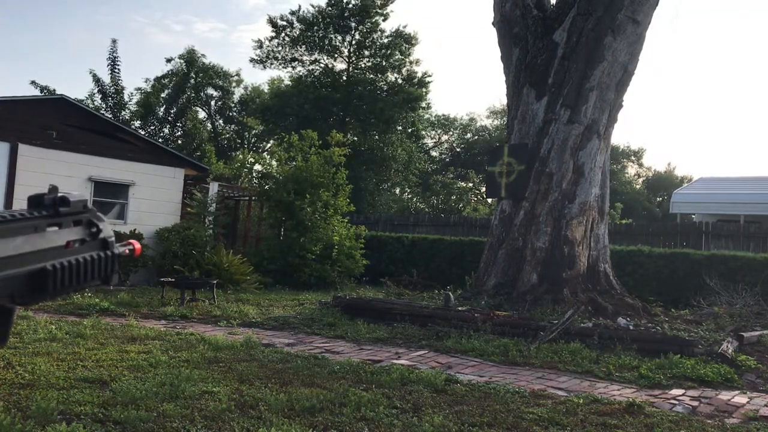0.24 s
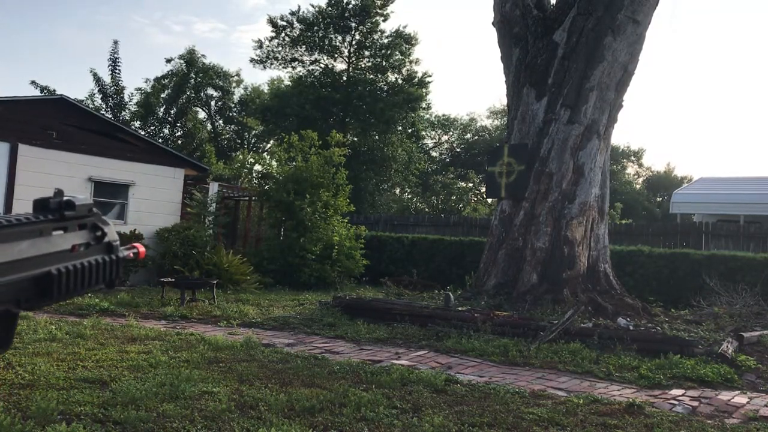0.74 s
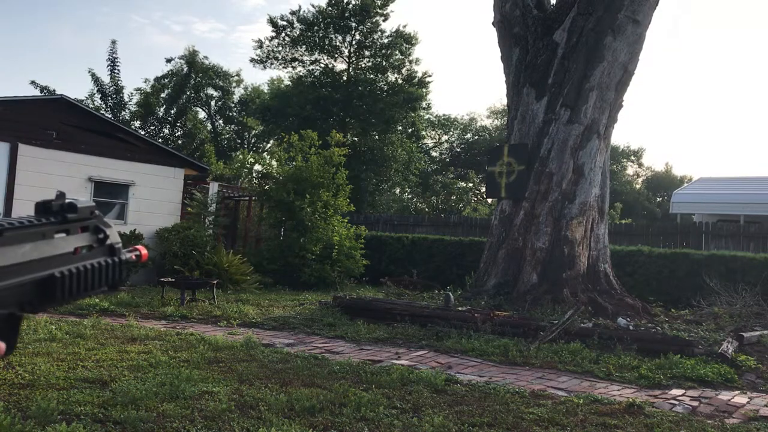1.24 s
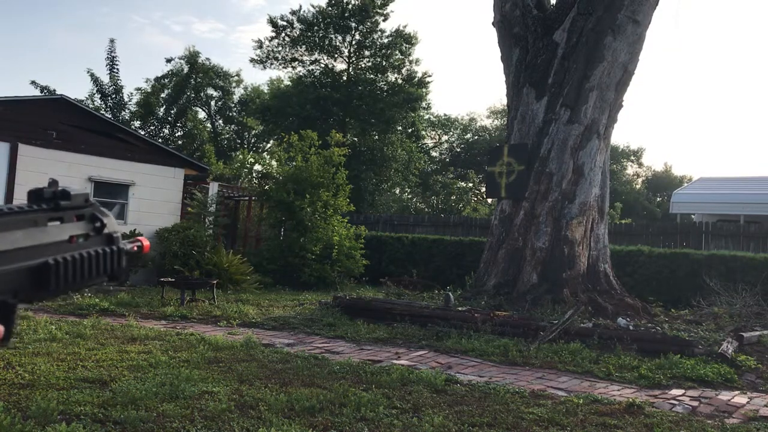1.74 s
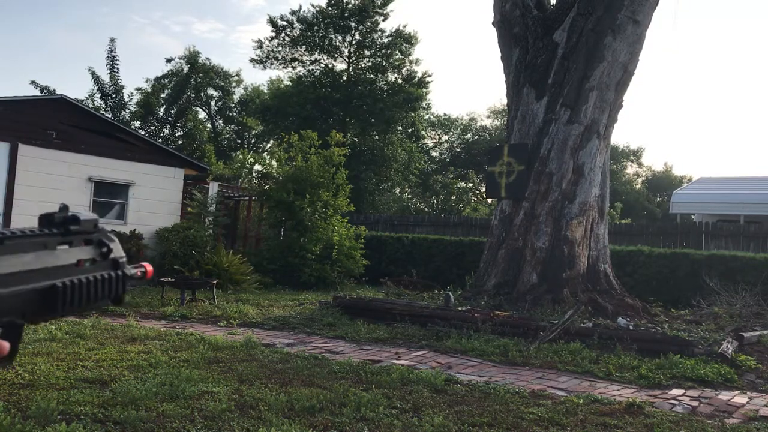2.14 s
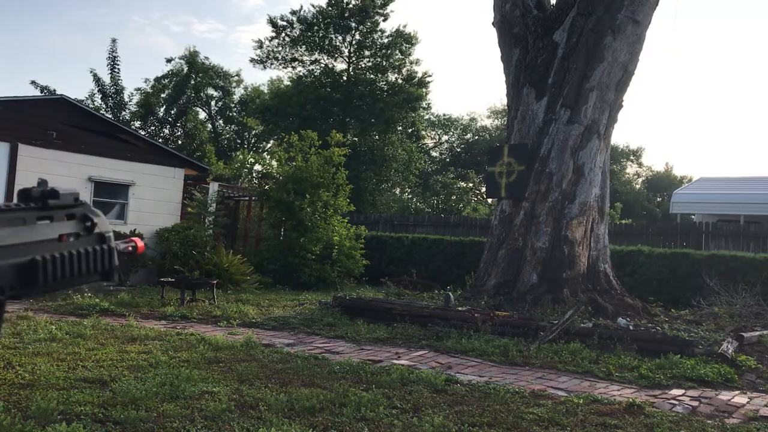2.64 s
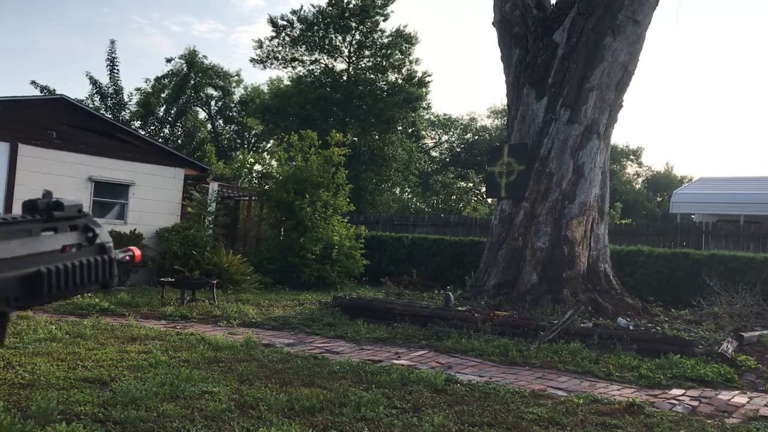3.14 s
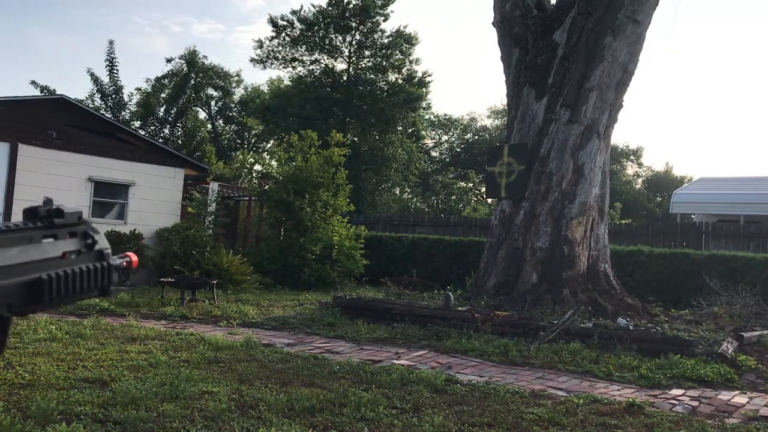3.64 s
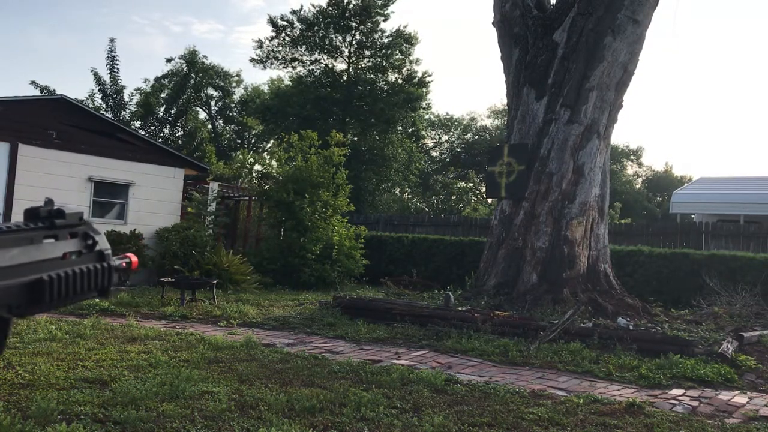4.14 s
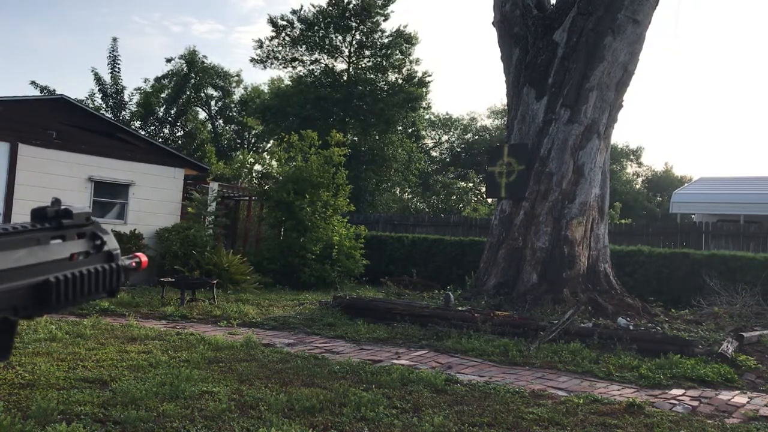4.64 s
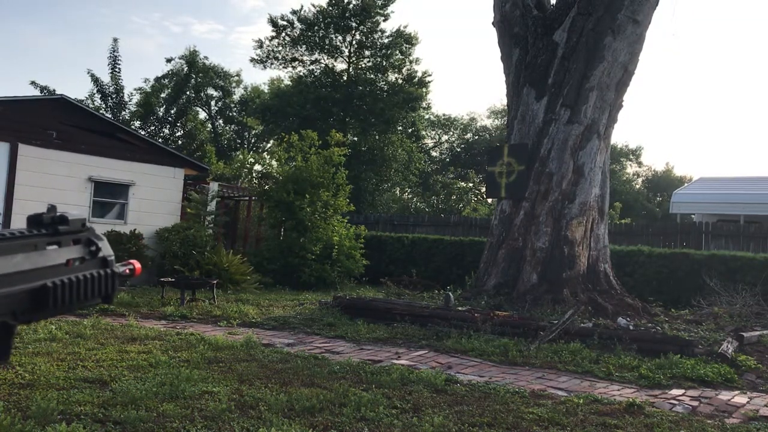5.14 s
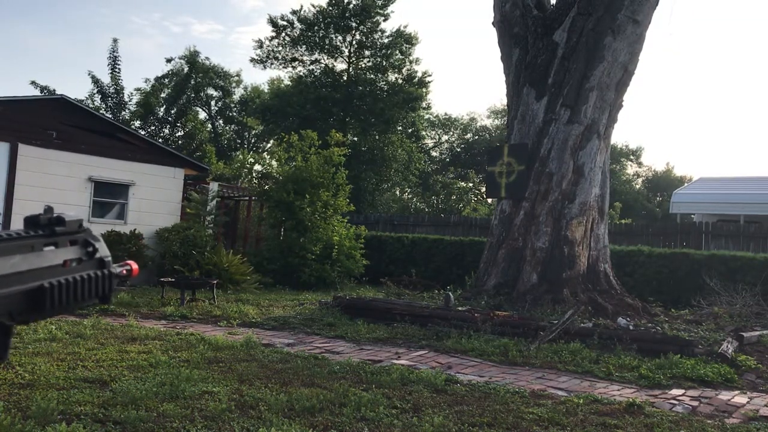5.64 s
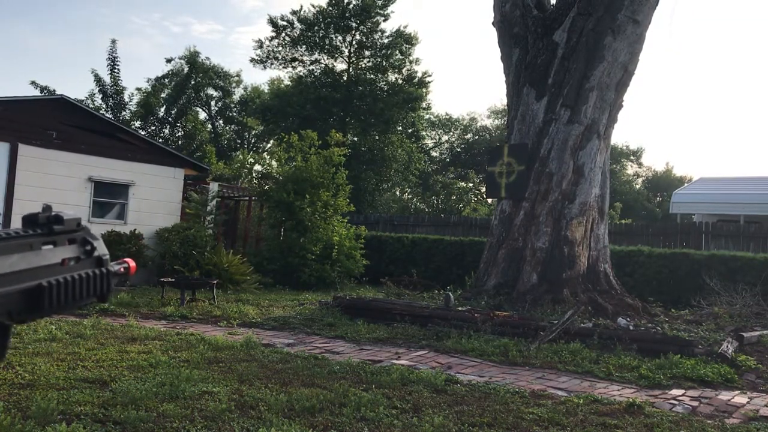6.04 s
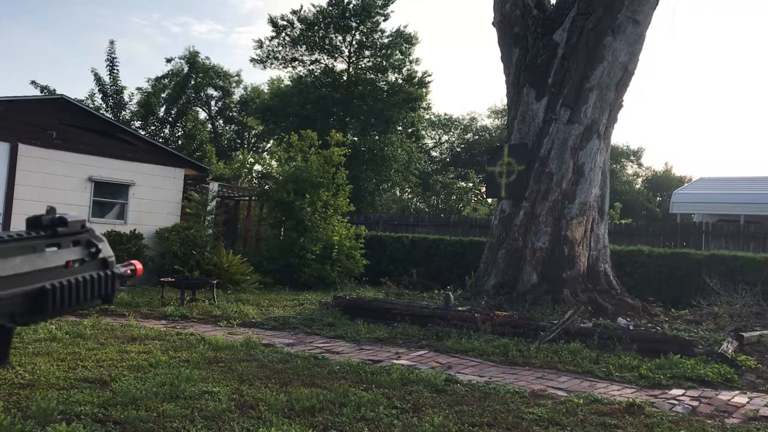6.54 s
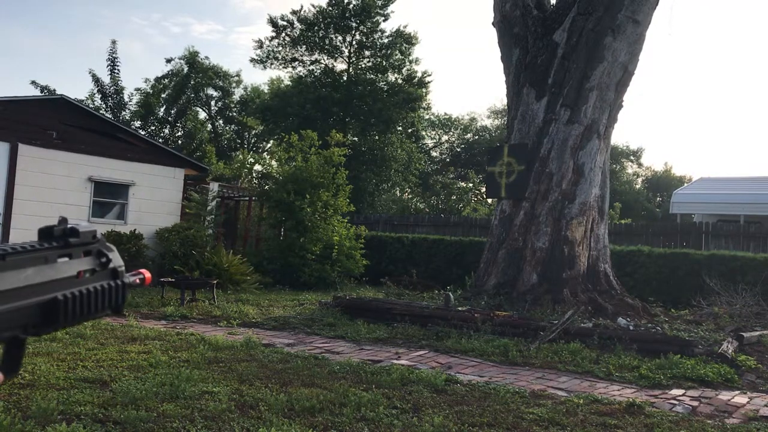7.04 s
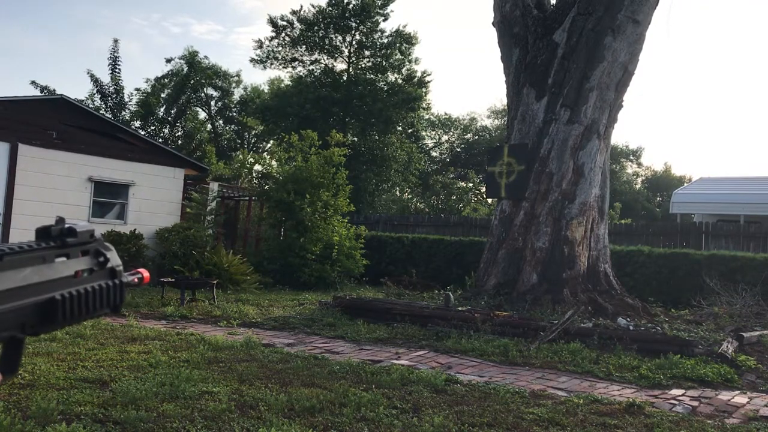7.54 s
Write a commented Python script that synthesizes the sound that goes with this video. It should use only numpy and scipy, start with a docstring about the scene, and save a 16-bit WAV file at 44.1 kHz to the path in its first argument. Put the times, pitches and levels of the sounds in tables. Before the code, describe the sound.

Two close full-auto bursts from an electric airsoft gun, the second much longer, clacking and whirring as pellets tick against a tree.

```python
"""Airsoft rifle in a backyard

An electric airsoft rifle fires two slow full-auto bursts close to the microphone. In each cycle the
gears whine lower as they load the spring, the piston slams home and air pops from the barrel; half a
cycle later the pellet hits a tree. Between the bursts the gears run back against their latch, a sleeve
rubs and the gun clicks in the hands. Distant traffic and light air lie underneath."""
import sys
import numpy as np
from scipy import signal
from scipy.fft import rfft, irfft
from scipy.io import wavfile

SR = 44100
rng = np.random.default_rng(int(sys.argv[2]) if len(sys.argv) > 2 else 0)


def unload_wav(signal):
    """Save mono or channel-first audio to the path in sys.argv[1] as 16-bit WAV at rate SR, clipped to [-1, 1]."""
    wavfile.write(
        sys.argv[1],
        SR,
        np.round(np.clip(np.atleast_2d(signal).T, -1, 1) * 32767).astype(np.int16),
    )


N = 343980
TIME = np.arange(N) / SR
AGE = np.arange(2048) / SR  # time within one short sound
RELEASE_S, PULL_S, CYCLE_S = 1.31, 2.995, .137  # trigger off, trigger on again, nominal cycle


def undb(db):
    """Decibels to amplitude."""
    return 10 ** (np.asarray(db) / 20)


def unit(x):
    """Scale to rms 1."""
    return x / np.sqrt(np.mean(x ** 2))


def burst(x, db, span_s):
    """Scale x so that its energy, spread over span_s, has level db."""
    return x * undb(db) / np.sqrt(np.sum(x ** 2) / (span_s * SR))


def add(out, s, x):
    """Mix x into out from time s."""
    i = int(s * SR)
    part = x[max(0, -i):max(0, N - i)]
    out[max(0, i):max(0, i) + len(part)] += part


def wander(rate_hz):
    """Smooth random motion, rms 1."""
    knots = rng.standard_normal(int(N / SR * rate_hz) + 2)
    return unit(np.interp(TIME * rate_hz, np.arange(len(knots)), knots))


def response(points, peaks=(), size=4096):
    """Minimum-phase impulse response from points (Hz, dB) and peaks (Hz, width Hz, dB)."""
    f = np.maximum(np.fft.rfftfreq(size, 1 / SR), 1)
    hz, db = np.transpose(points)
    db = np.interp(np.log(f), np.log(hz), db)
    db += sum(gain / (1 + (2 * (f - centre) / width) ** 2) for centre, width, gain in peaks)
    cepstrum = irfft(np.log(undb(db)))
    cepstrum[1:size // 2] *= 2
    cepstrum[size // 2 + 1:] = 0
    return irfft(np.exp(rfft(cepstrum)))[:size // 2]


def through(x, h):
    """Filter x with impulse response h."""
    return signal.fftconvolve(x, h)[:len(x)]


def chatter(decay_s):
    """Fading cloud of tiny contacts, energy 1."""
    x = rng.standard_normal(len(AGE)) * np.exp(-AGE / decay_s)
    return x / np.linalg.norm(x)


def whiten(x):
    """Flatten a contact cloud's spectrum, keep its phase, fade its tail."""
    return irfft(np.exp(1j * np.angle(rfft(x)))) * np.exp(-AGE / .0082)


def ring(hz, t60):
    """One damped mode."""
    return np.sin(2 * np.pi * hz * AGE) * np.exp(-np.log(1000) * AGE / t60)


def puff(hz, t60):
    """Damped swing of air, as much in as out."""
    return np.gradient(ring(hz, t60) * (1 - np.exp(-AGE * hz * 4)))


def grains(spread_db):
    """Noise of unevenly sized contacts, rms 1."""
    return unit(rng.standard_normal(N) * undb(spread_db * wander(2500)))


# shell resonances: (frequency [Hz], width [Hz], gain [dB])
SHELL_PEAKS = [(483.7, 31, 5.5), (640, 160, 4.5), (924, 157, 7.5), (1205, 240, 7), (1770, 230, 0.5),
               (3080, 130, 2), (4450, 700, 6.5), (5730, 340, 3), (11970, 480, 7.5), (14470, 360, 7.5)]
# slam spectrum: (frequency [Hz], gain [dB])
SLAM_SPECTRUM = [(40, -27), (150, -4), (320, -19.5), (600, -5.5), (1000, -4), (1450, -3), (1850, 2),
                 (2200, -1), (2650, 3), (4200, -2), (5200, -7.5), (5900, 2), (7500, -3.5), (10300, -6.5),
                 (12000, -7.5), (15500, -16.5)]
# piston bounces: (delay [s], relative level [dB])
BOUNCES = [(0, -1), (.001, -9.5), (.0019, -5.5), (.0025, -3)]
# receiver modes: (frequency [Hz], level [dB], t60 [s])
RECEIVER_MODES = [(481.6, -27, 0.059), (940, -30, 0.053)]


def piston(out, s, strength_db, pressure, contacts, body):
    """The piston scrapes forward, slams and bounces, cushioned by air; the receiver recoils and rings."""
    blows = .87 * contacts + .6 * chatter(decay_s=.0032) + .04 * chatter(decay_s=.012)
    for delay_s, db in BOUNCES:
        delay_s *= 1 + .015 * rng.standard_normal()
        blows[int(delay_s * SR)] -= undb(db + 1.5 * rng.standard_normal())
    cushion_db = -pressure
    add(out, s, burst(through(blows, body), -11 + strength_db + cushion_db, span_s=.0038))
    add(out, s, sum(undb(db + strength_db) * ring(hz, t60) for hz, db, t60 in RECEIVER_MODES))
    scrape = through(np.r_[chatter(decay_s=.003)[::-1], np.zeros(len(AGE))], body)
    add(out, s - AGE[-1], burst(scrape, -20 + strength_db, span_s=.0035))
    recoil = puff(hz=210, t60=.012)
    add(out, s - .0018, burst(recoil, db=-24, span_s=.00063))


# barrel air modes: (frequency [Hz], relative level [dB], t60 [s])
BARREL_MODES = [(230, -16.5, 0.029), (356.5, -5.5, 0.025), (500, -11, 0.02), (1076, 6.5, 0.0098),
                (1826, 5.5, 0.01), (2444, 9, 0.006), (3620, -14.5, 0.0094)]


def air_pop(out, s, strength_db, seal, pressure, body):
    """Air rings the barrel and spits at the muzzle; a tight seal pops later and thumps deeper."""
    leaky_s, sealed_s = .0022, .0038
    leaky_hz, sealed_hz = 660, 150
    pop_s = s + leaky_s + (sealed_s - leaky_s) * seal ** 2
    pop = sum(undb(db + rng.standard_normal()) * puff(hz * (1 + .056 * rng.standard_normal()), t60) / hz
              for hz, db, t60 in BARREL_MODES)
    add(out, pop_s, burst(pop, -17.5 + strength_db + 3.5 * pressure, span_s=.004))
    spit = through(chatter(decay_s=.00091), body)
    add(out, pop_s, burst(spit, -17.5 + strength_db, span_s=.0047))
    thump_hz = leaky_hz * (sealed_hz / leaky_hz) ** seal
    add(out, pop_s - .0006, burst(puff(thump_hz, t60=1.5 / thump_hz), db=-31, span_s=.013))


# small-part tick spectrum: (frequency [Hz], gain [dB])
TICK_SPECTRUM = [(200, -36), (3000, -19), (6000, 1), (8500, 2.5), (10300, -5), (12000, -0.5), (15500, -32)]
# dull knock spectrum, gear or bark: (frequency [Hz], gain [dB])
KNOCK_SPECTRUM = [(200, -32), (480, -2.5), (700, -2), (1050, 6), (1500, 4), (3000, -26), (12000, -20)]


def gear_pickup(out, s):
    """After a slam the anti-reversal latch ticks, the gear knocks on the piston, a loose part ticks."""
    small_part = response(TICK_SPECTRUM)
    latch = through(chatter(decay_s=.0004), small_part)
    latch = burst(latch, db=-26.5 + 3.5 * rng.standard_normal(), span_s=.0015)
    add(out, s + .02 + .0027 * rng.standard_normal(), latch)
    knock = through(chatter(decay_s=.0015), response(KNOCK_SPECTRUM, SHELL_PEAKS))
    add(out, s + .029, burst(knock, db=-32, span_s=.004))
    loose = through(chatter(decay_s=.0006), small_part)
    loose = burst(loose, db=-29 + 3 * rng.standard_normal(), span_s=.0015)
    add(out, s + rng.uniform(.025, .055), loose)


# shots: (time [s], strength [dB], air seal [0-1], pellet energy into loose bark [0-1])
SHOTS = [(-.02, 3, 0.6, 0.06), (0.1198, 1, 1, .98), (0.2552, -.5, 0.01, 0.24), (.3952, -0.5, 0.98, 0.15),
         (.534, -1, 0.58, 0.37), (.672, -1.5, 0.56, 0.36), (0.8062, -0.5, 0.56, 0.27),
         (0.94, 0, 0.68, 0.24), (1.0753, 0, 0.56, 0.43), (1.209, -1, 0.53, 0.05), (3.0454, -1, 0.59, 0),
         (3.1841, -1, 0.99, .95), (3.3212, 0, 0.38, 0.03), (3.4585, -2, 0.95, 0.03),
         (3.5956, -0.5, 0.92, 0.22), (3.7318, 1.5, 0.92, 0.06), (3.8685, 1, 0.98, 0.13),
         (4.0059, .5, 0.88, 0.36), (4.1417, 2, 0.98, .01), (4.2786, 2, 0.96, 0.42),
         (4.416, 2.5, 0.96, 0.91), (4.5513, -.5, 0.07, 0.06), (4.6898, 0.5, 1, 0.04),
         (4.8281, -1, 0.96, .96), (4.9654, 0, 0.01, 0.37), (5.103, -0.5, 0.96, 0.06),
         (5.2417, 2, 0.88, .93), (5.3778, -1, 0.07, 0.17), (5.515, 1, 0.99, 0.92),
         (5.6521, -.5, 0.04, 0.38), (5.7893, 0, 0.96, 0.2), (5.9288, 1.5, 0.93, .25),
         (6.0668, 0, 0.95, .65), (6.2041, -0.5, 0.3, .02), (6.345, -1, 0.95, 0.13), (6.4858, -0.5, 1, 0.9),
         (6.6272, 2, 0, 0.26), (6.7706, 3.5, 0.97, 0.1), (6.912, 2, 1, 0.82), (7.0545, -1, 0.52, 0.3),
         (7.198, 1, 0.94, 0.88), (7.3393, 0, 0.1, 0.38), (7.4822, 2, 0.96, 0.89), (7.6253, -0.5, 0, 0.28),
         (7.7699, 1, 0.94, .2)]


def shots():
    """Each shot: piston slam, air pop, gears taking up the load again."""
    out, body = np.zeros(N), response(SLAM_SPECTRUM, SHELL_PEAKS)
    contacts = whiten(chatter(decay_s=.0035))  # same parts, same order on every shot
    for s, strength_db, seal, _ in SHOTS:
        pressure = 4 * seal * (1 - seal)  # at half seal the pellet leaves at peak pressure
        piston(out, s, strength_db, pressure, contacts, body)
        air_pop(out, s, strength_db, seal, pressure, body)
        gear_pickup(out, s)
    return out


def stroke():
    """Share of the cycle since the last slam, and that cycle's length in s."""
    shot_s = np.array(SHOTS)[:, 0]
    rest = np.sum(shot_s < RELEASE_S) - 1 + .75  # piston waits part-cocked between bursts
    slam_s = np.r_[shot_s, shot_s[-1] + CYCLE_S]
    knot_s = np.sort(np.r_[slam_s, RELEASE_S, PULL_S])
    turns = np.interp(TIME, knot_s, np.sort(np.r_[:len(slam_s), rest, rest]))
    gap_s = np.diff(slam_s)
    length_s = np.where(gap_s < 2 * CYCLE_S, gap_s, CYCLE_S)
    return turns % 1, length_s[np.minimum(turns.astype(int), len(shot_s) - 1)]


def motor_speed():
    """Share of full speed: running, coasting, thrown back by the spring, restarting."""
    coast_s, rebound_at_s, rise_s, fall_s, spin_up_s = .036, 1.365, .025, .05, .014
    coast = np.exp(-np.maximum(TIME - RELEASE_S, 0) / coast_s)
    since_s = TIME - rebound_at_s
    rebound = .62 * np.exp(-np.abs(since_s) / np.where(since_s < 0, rise_s, fall_s))
    restart = 1 - .3 * np.exp(-np.maximum(TIME - PULL_S, 0) / spin_up_s)
    return np.where(TIME < PULL_S, np.maximum(coast, rebound), restart)


# mesh harmonics: (multiple, level [dB])
MESH_HARMONICS = [(1, -0.5), (2, -6), (3, -3.5), (4, -9)]
# shell radiation of the whine: (frequency [Hz], gain [dB])
WHINE_SPECTRUM = [(400, -6.5), (1200, -3.5), (1800, -3), (2400, 1), (3600, -6.5), (4700, -6.5), (5300, -22),
                  (7000, -1.5), (12000, -24.5)]
# resonances the harmonics sweep through: (frequency [Hz], width [Hz], gain [dB])
WHINE_PEAKS = [(1559, 132, 9.1), (3160, 120, 12), (4534, 250, 10.3)]
# whine gain at the hardest pull: (time [s], gain [dB])
WHINE_GAIN = [(.6, -26), (3.1, -23.5), (5.5, -23), (7.7, -24)]


def gear_whine(tooth_phase, rotor, share):
    """Mesh tone, loudest at the hardest pull; unlike teeth roughen the high harmonics most."""
    whine = np.zeros(N)
    for multiple, db in MESH_HARMONICS:
        rough_db = .51 * rotor + (1.5 + multiple) * 1.05 * wander(900)
        whine += undb(db + rough_db) * np.sin(multiple * (tooth_phase + .28 * rotor))
    whine = through(whine, response(WHINE_SPECTRUM, WHINE_PEAKS)) * undb(wander(70))
    peak_share, swell_db, fade_db = .73, 19.5, 29.5  # slopes per cycle
    off_peak_db = np.maximum(swell_db * (peak_share - share), fade_db * (share - peak_share))
    return whine * undb(np.interp(TIME, *np.transpose(WHINE_GAIN)) - off_peak_db)


# tooth grind spectrum: (frequency [Hz], gain [dB])
GRIND_SPECTRUM = [(150, -25), (350, -43), (560, -4), (760, -10.5), (1000, -7), (1600, 2.5), (2300, -2),
                  (3000, 7), (4500, -0.5), (5300, -2), (7300, -8), (10300, -16), (11800, -16), (15500, -23)]


def tooth_grind(tooth_phase, rotor, share, load):
    """Teeth grind under load, less when slack, and clash when the slam jolts them."""
    loaded_db, slack_db, jolt_db = -29.5, -38, -20
    contacts = grains(spread_db=.5) * undb(2.5 * np.cos(tooth_phase) + 1.2 * rotor + 1.76 * wander(120))
    grind = unit(through(contacts, response(GRIND_SPECTRUM, SHELL_PEAKS)))
    return grind * (load * undb(loaded_db) + undb(slack_db) + undb(jolt_db - 226.5 * share))


# spring rattle spectrum: (frequency [Hz], gain [dB])
SPRING_SPECTRUM = [(60, -26), (150, -21), (230, 1.5), (330, -12.5), (500, -3.5), (750, -8), (1000, -4),
                   (2500, -0.5), (6000, -10.5), (10300, -11.5), (12000, -18), (15500, -19)]


def spring_rattle(share):
    """The spring rattles after each slam and again as it comes free."""
    contacts = grains(spread_db=3.5) * undb(1.8 * wander(200))
    rattle = unit(through(contacts, response(SPRING_SPECTRUM, SHELL_PEAKS)))
    slammed_db, freed_db = -25 - 29 * share, -28 - 85 * (1 - share)
    return rattle * (undb(slammed_db) + undb(freed_db))


# motor brush spectrum: (frequency [Hz], gain [dB])
BRUSH_SPECTRUM = [(3000, -36.5), (7000, -14), (10300, -14), (12000, -4), (14300, 1), (15500, -4.5)]


def brushes(rotor):
    """The motor brushes spark once a turn."""
    sparks = grains(spread_db=4) * undb(9.7 * rotor)
    return unit(through(sparks, response(BRUSH_SPECTRUM, SHELL_PEAKS))) * undb(-41.5)


def gearbox():
    """The gears slow as the spring tightens; all their noise fades with motor speed."""
    free_mesh_hz, pinion_teeth, spring_drag, end_sag = 2417, 10, .72, .28
    share, cycle_s = stroke()
    spin = motor_speed()
    speed = 1 / (1 + spring_drag * share ** .8 + end_sag * share ** 6)
    flutter = .00802 + .1195 * np.maximum(speed - .67, 0)  # lightly loaded gears run loose
    mesh_hz = free_mesh_hz * CYCLE_S / cycle_s * speed * spin * (1 + flutter * wander(700))
    tooth_phase = 2 * np.pi * np.cumsum(mesh_hz) / SR
    rotor = np.cos(tooth_phase / pinion_teeth)  # pinion slightly off centre
    picked_up, let_go = (.5 + .5 * np.tanh((share - at) / .037) for at in (.15, .835))
    whine = picked_up * gear_whine(tooth_phase, rotor, share)
    grind = tooth_grind(tooth_phase, rotor, share, load=picked_up * (1 - let_go))
    return spin ** 3.2 * (whine + grind + spring_rattle(share) + brushes(rotor))


# background spectrum: (frequency [Hz], gain [dB])
YARD_SPECTRUM = [(20, -26.5), (45, -2.5), (100, -4), (170, -10.5), (280, -18.5), (480, -23.5),
                 (1100, -16.5), (1700, -24.5), (2600, -31), (4000, -36), (8000, -43.5), (15500, -50)]


def yard():
    """Distant traffic and light air in the trees."""
    return unit(through(rng.standard_normal(N), response(YARD_SPECTRUM))) * undb(-51 + wander(2.76))


# hard impact spectrum: (frequency [Hz], gain [dB])
CRACK_SPECTRUM = [(200, -40.5), (600, -18.5), (1000, -16), (2300, -8.5), (3200, -8), (4200, 1.5),
                  (5300, -4.5), (7000, -13.5), (8500, -7), (10300, -15), (12000, -10.5), (15500, -15)]
# glancing pellets hitting further on: (time [s], level [dB])
RICOCHETS = [(3.2744, -16.5), (6.9921, -13.5)]


def pellets():
    """Each pellet splits its energy between a crack on hard wood and a knock in bark; two ricochet."""
    flight_s, bark_lead_s = .0686, .0015  # loose bark stands proud, so is met sooner
    out, hard, soft = np.zeros(N), response(CRACK_SPECTRUM), response(KNOCK_SPECTRUM)
    trunk = whiten(chatter(decay_s=.0032))  # the same spot answers alike each time

    def crack(db):
        """One sharp hit on hard wood."""
        blow = trunk + .5 * chatter(decay_s=.003) + .25 * chatter(decay_s=.006)
        blow[0] += .2
        return burst(through(blow, hard), db, span_s=.0041)

    for s, _, _, bark in SHOTS:
        hit_s = s + flight_s - bark_lead_s * bark
        add(out, hit_s, np.sqrt(1 - bark) * crack(db=-11))
        knock = burst(through(chatter(decay_s=.0019), soft), db=-21, span_s=.0061)
        add(out, hit_s, np.sqrt(bark) * knock)
    for s, db in RICOCHETS:
        add(out, s, crack(db))
    return out


# latch catches: (time [s], level [dB])
CATCHES = [(1.369, -25.5), (1.397, -36)]


def latch_catches():
    """The spring drives the gears back against the latch, which catches twice."""
    out, metal = np.zeros(N), response(CRACK_SPECTRUM, SHELL_PEAKS)
    for s, db in CATCHES:
        add(out, s, burst(through(chatter(decay_s=.0015), metal), db, span_s=.0032))
    return out


# sleeve rubs: (start [s], length [s], level [dB])
RUBS = [(1.40, 0.34, -63), (1.703, 0.048, -57), (2.15, 0.16, -60)]


def sleeve():
    """Cloth slides over the stock in short swishes."""
    fabric = response([(1000, -20), (3500, -1), (6500, 2), (10000, -4), (15500, 1)])
    hiss = unit(through(grains(spread_db=0), fabric))
    return hiss * sum(undb(db) * np.sin(np.pi * np.clip((TIME - s) / length_s, 0, 1))
                      for s, length_s, db in RUBS)


# trigger, selector and fitting clicks: (time [s], peak [dB], decay [s])
CLICKS = [(1.753, -23, 0.002), (2.136, -30.5, 0.0013), (2.396, -20, 0.0018), (2.427, -18.5, 0.0011),
          (2.454, -16.5, 0.0012), (2.524, -25, 0.00092), (2.528, -31, 0.0019), (2.683, -35.5, 0.0022),
          (2.74, -14.5, 0.0015), (2.753, -17, 0.0013), (2.774, -20.5, 0.0011), (2.996, -8.5, 0.0018)]
# click spectrum: (frequency [Hz], gain [dB])
CLICK_SPECTRUM = [(500, -25), (900, -2), (1300, -0.5), (1800, 10), (2400, -4), (3000, -0.5), (4200, -1),
                  (6500, -0.5), (8500, -2.5), (10300, -6.5), (12500, -4), (15500, -12)]
# resonances of those parts: (frequency [Hz], width [Hz], gain [dB])
FITTING_PEAKS = [(1050, 300, 5), (1720, 220, 5), (4200, 450, 7), (6400, 800, 3), (12000, 900, 5)]
# grip bumps: (time [s], relative level [dB])
BUMPS = [(1.50, -45), (2.035, -43), (2.285, -49), (2.662, -43.5)]


def handling():
    """Small parts click in the plastic shell; the hands bump the grip and make it creak in tiny ticks."""
    out, fittings = np.zeros(N), response(CLICK_SPECTRUM, FITTING_PEAKS)
    for s, db, decay_s in CLICKS:
        click = through(chatter(decay_s) + .22 * chatter(decay_s=.0062), fittings)
        add(out, s, click / np.abs(click).max() * undb(db))
    bump = ring(hz=58.3, t60=.073) * (1 - AGE / AGE[-1])
    for s, db in BUMPS:
        add(out, s, undb(db + 14) * bump)
    creak = response([(500, -27.5), (2500, -17), (6500, 6), (9000, -8), (15500, -20)])
    for s, db in zip(rng.uniform(RELEASE_S, PULL_S, size=16), rng.normal(-61, 3, size=16)):
        add(out, s, burst(through(chatter(decay_s=.00085), creak), db, span_s=.0056))
    return out


def echoes(x, t60, wet_db):
    """House wall, fence and foliage scatter a thin, dull tail."""
    t = TIME[:SR]
    tail = rng.standard_normal(len(t)) * np.exp(-np.log(1000) * t / t60) * (1 - np.exp(-t / .0046))
    tail = through(tail, response([(100, -3.5), (400, -12.5), (1200, 6.5), (4000, -9), (14000, -27)]))
    return undb(wet_db) * through(x, tail / np.linalg.norm(tail))


def scene():
    """Rifle, echoes and yard, mono."""
    gun = gearbox() + shots() + pellets() + latch_catches() + handling() + sleeve()
    return (gun + echoes(gun, t60=.62, wet_db=-29) + yard())[None]


def record(dry):
    """The microphone sheds the deep bass and rounds the highest peaks; the top is cut."""
    low_hz, top_hz, ceiling = 38, 15900, .95
    thin = signal.sosfilt(signal.butter(2, low_hz, "high", fs=SR, output="sos"), dry)
    rounded = thin / (1 + np.abs(thin / ceiling) ** 4) ** (1 / 4)
    return signal.sosfilt(signal.ellip(10, .2, 70, top_hz, fs=SR, output="sos"), rounded)


dry = scene()
out = record(dry)
unload_wav(out)
```